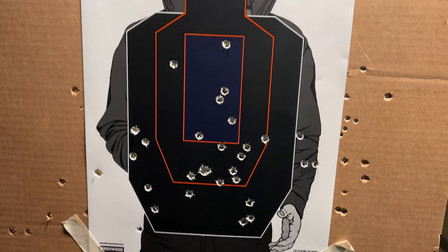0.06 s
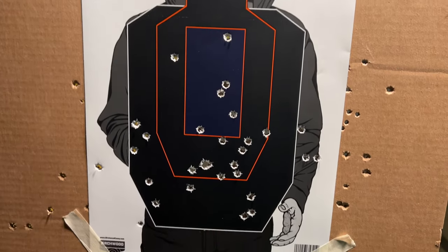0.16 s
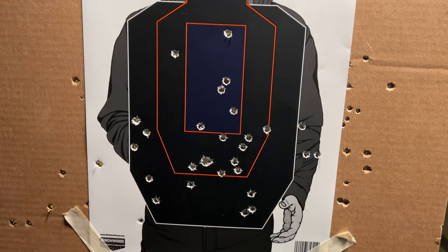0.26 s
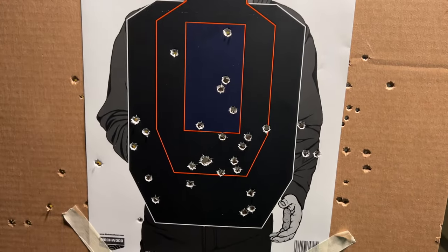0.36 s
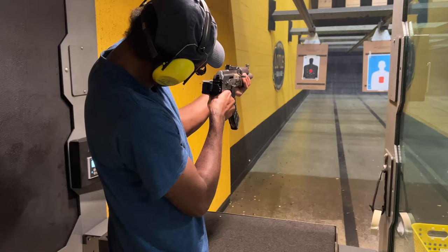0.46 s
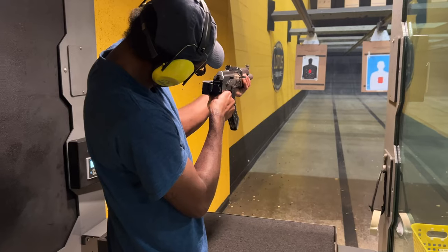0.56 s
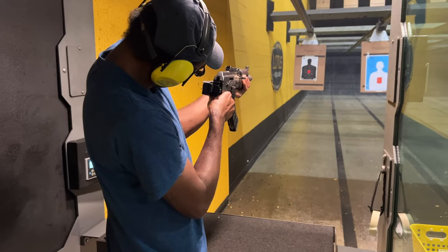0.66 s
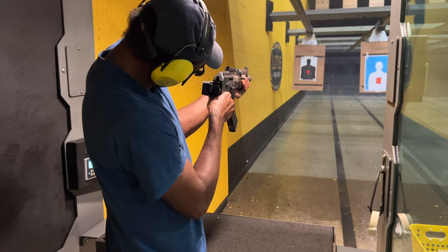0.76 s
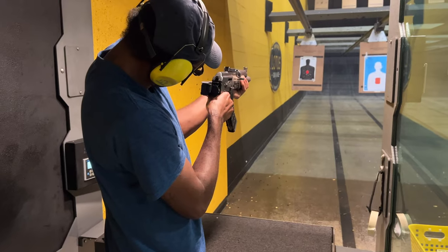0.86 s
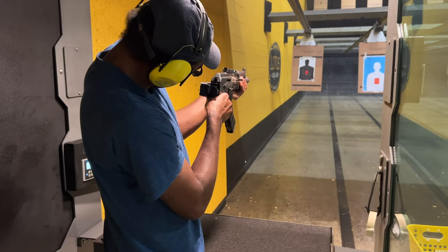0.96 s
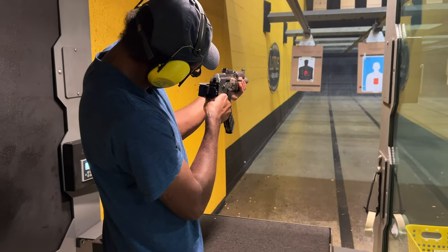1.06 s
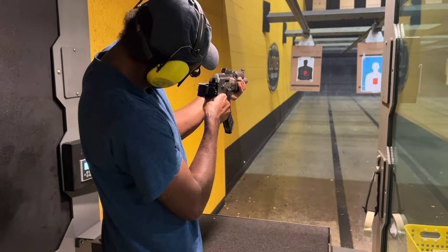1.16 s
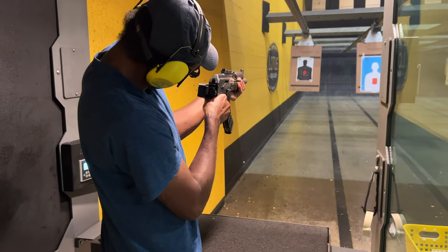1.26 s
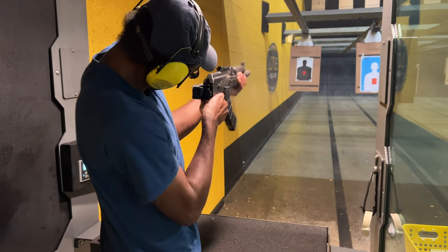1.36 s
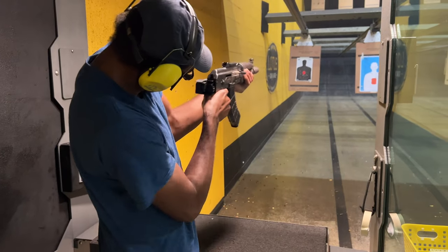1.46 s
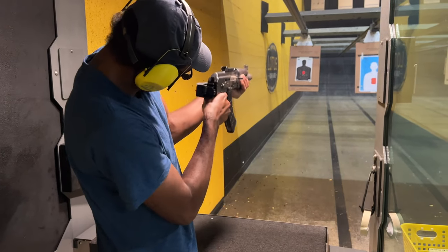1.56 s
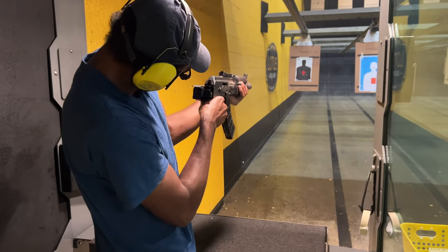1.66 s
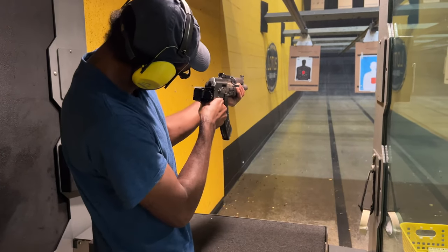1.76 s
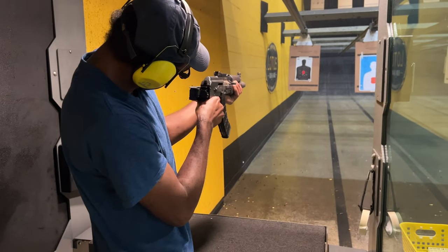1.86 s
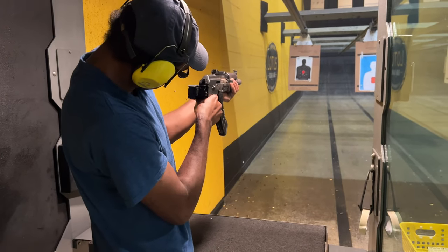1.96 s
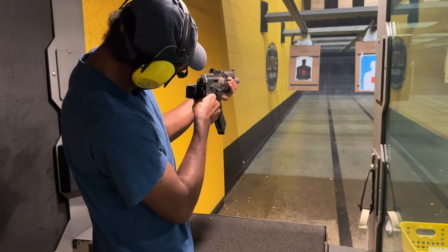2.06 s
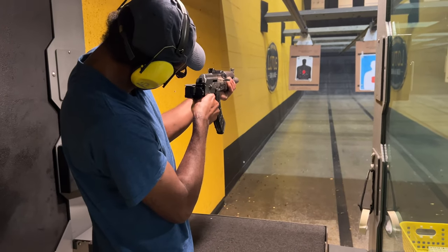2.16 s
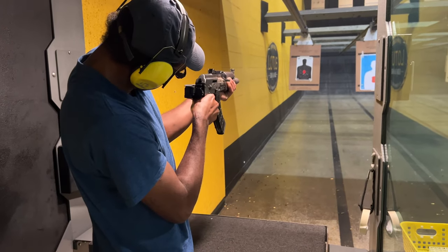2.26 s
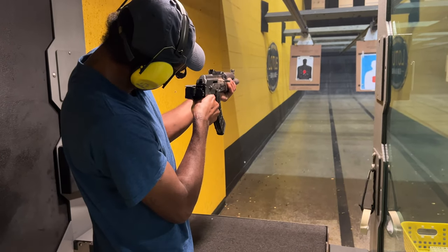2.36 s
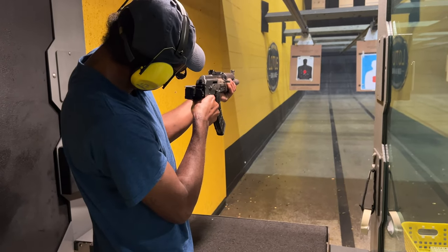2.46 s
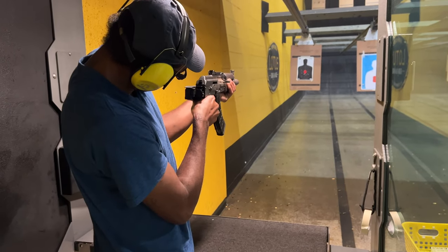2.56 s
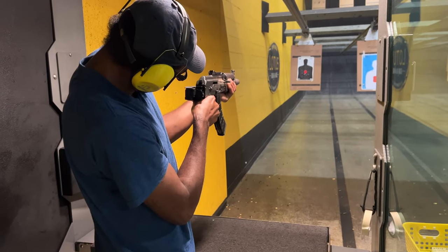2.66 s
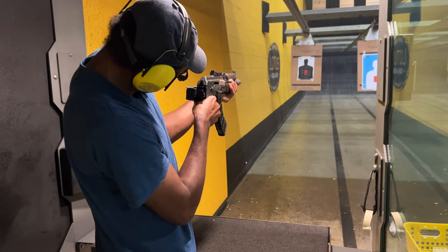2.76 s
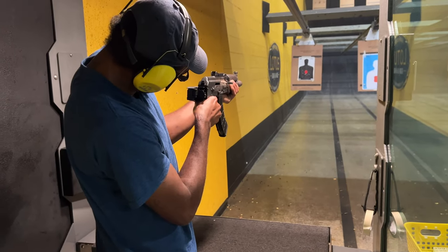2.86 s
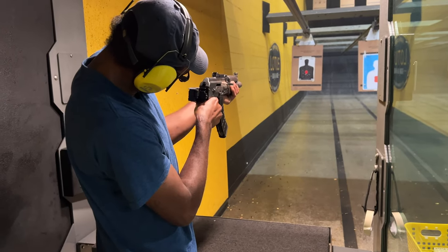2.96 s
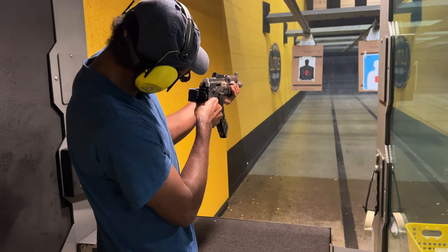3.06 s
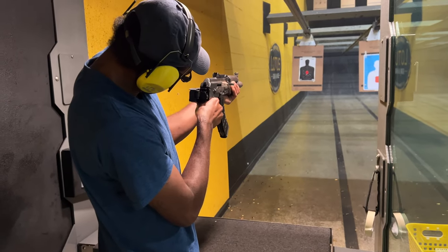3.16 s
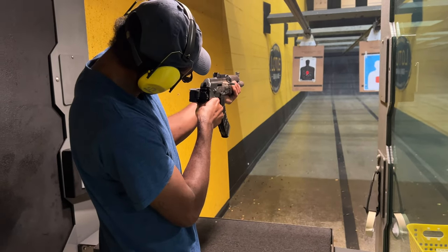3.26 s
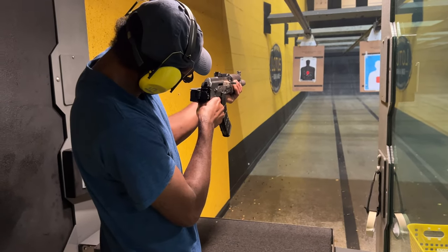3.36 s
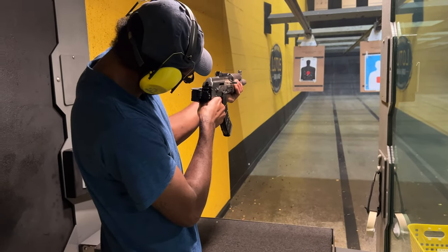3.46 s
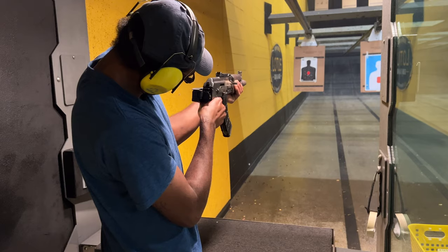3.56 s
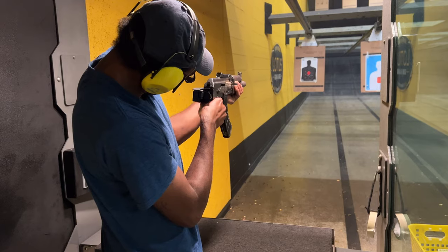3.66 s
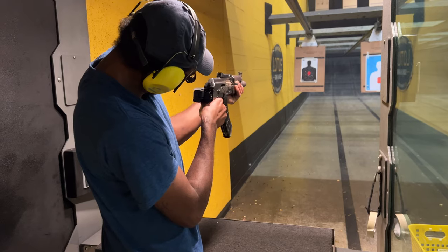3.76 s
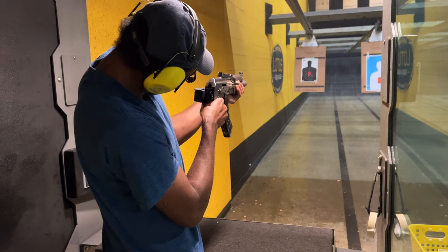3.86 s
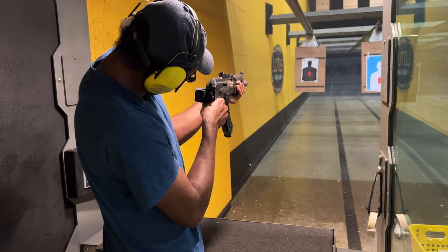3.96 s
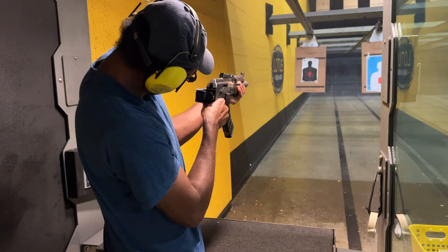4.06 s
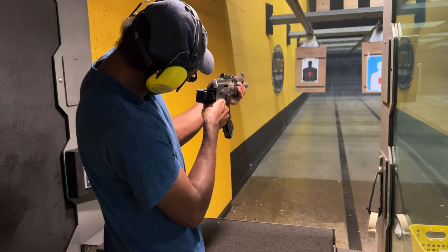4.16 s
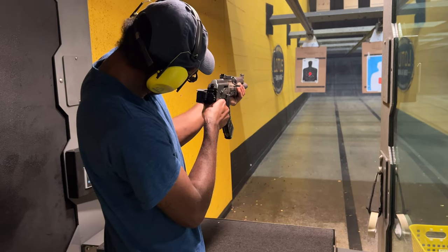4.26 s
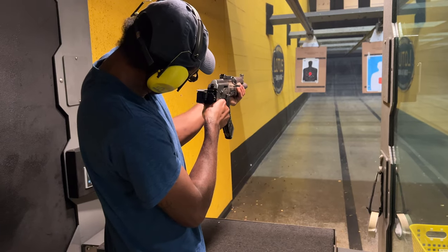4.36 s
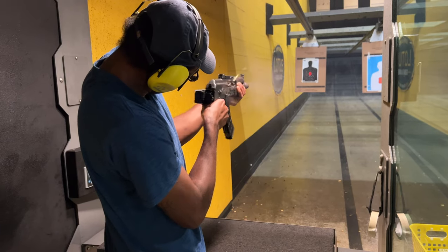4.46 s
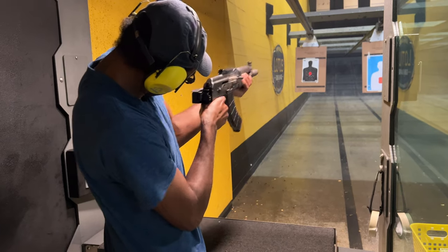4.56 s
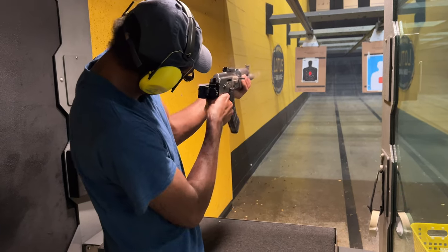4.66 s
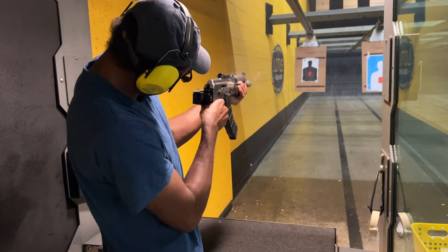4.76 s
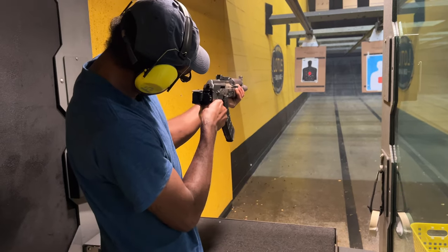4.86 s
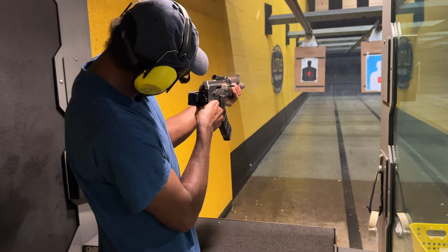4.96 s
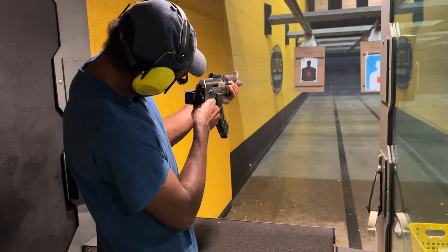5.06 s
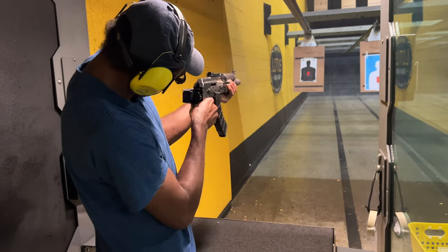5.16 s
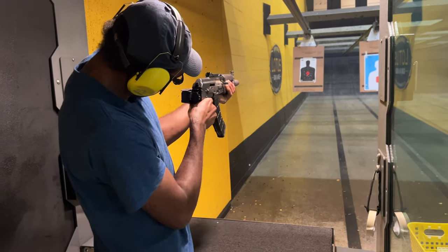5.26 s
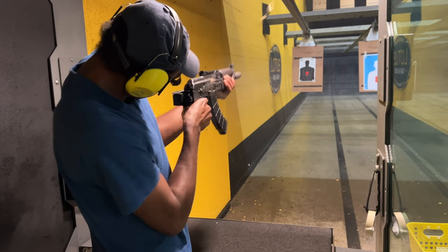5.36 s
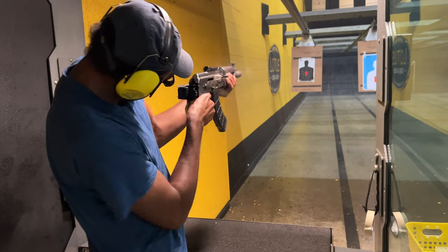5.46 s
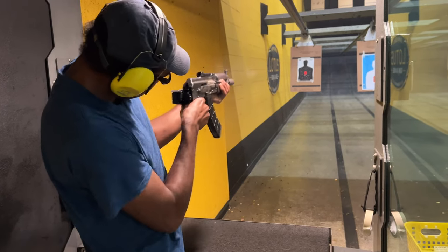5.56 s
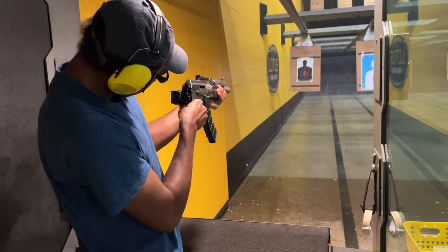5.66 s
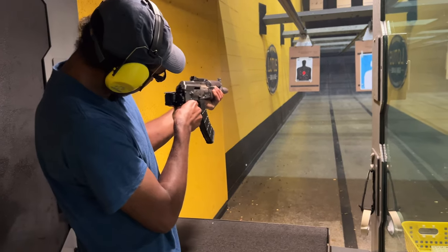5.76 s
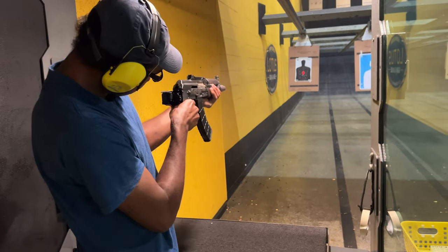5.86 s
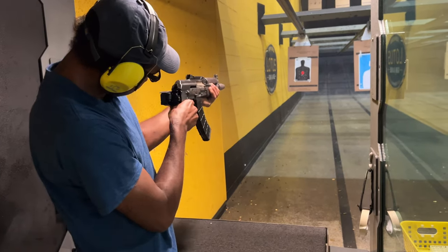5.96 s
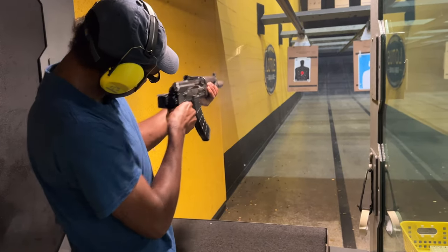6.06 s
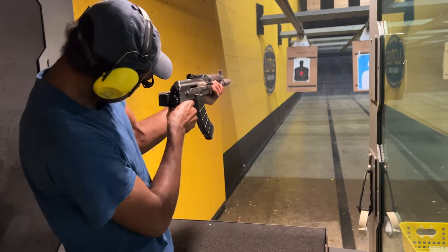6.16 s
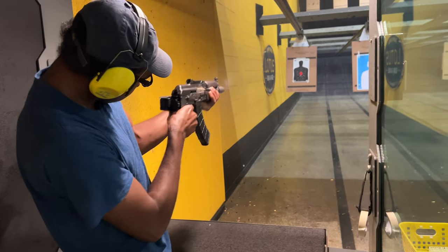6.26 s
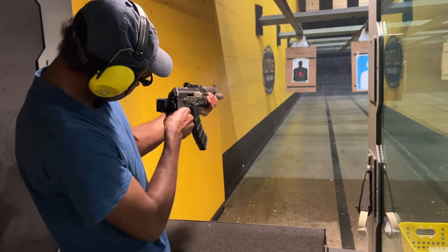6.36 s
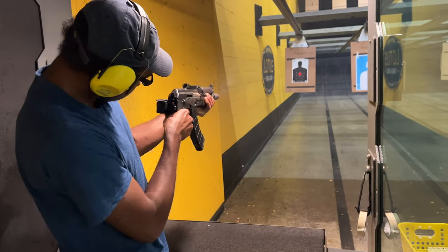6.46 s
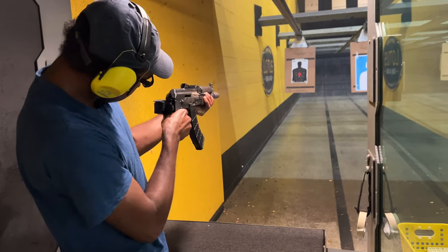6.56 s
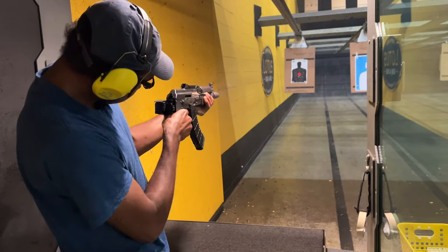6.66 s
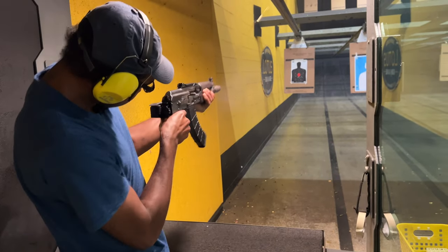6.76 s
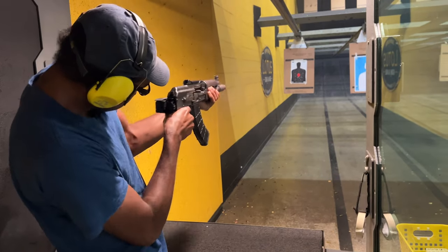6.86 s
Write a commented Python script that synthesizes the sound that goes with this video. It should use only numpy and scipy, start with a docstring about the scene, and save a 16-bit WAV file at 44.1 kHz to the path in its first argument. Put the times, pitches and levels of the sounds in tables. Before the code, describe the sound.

Ventilation hums in an indoor shooting range, then five loud gunshots crack and boom, each rolling away in a long concrete echo.

```python
"""Five pistol shots in a concrete indoor range, heard from just behind the shooter's booth.
Each is bands of two-channel noise under decay envelopes: booth blast, wave fronts, late return of the hall.
Filtered noise with wavering tones is the ventilation, loud at the target, then quieter in the booth.
A decaying sine with rustling noise settles the gun; a short dull noise burst comes just before each shot.
Spent cases tinkle on the floor as decaying modes of brass."""
import sys
import numpy as np
from scipy import signal
from scipy.fft import rfft, irfft, next_fast_len
from scipy.io import wavfile
from scipy.ndimage import uniform_filter1d

SR = 44100
rng = np.random.default_rng(int(sys.argv[2]) if len(sys.argv) > 2 else 0)


def store_wav(level_fs):
    """Save 16-bit WAV to argv[1]."""
    pcm = np.round(np.clip(np.atleast_2d(level_fs), -1, 1) * 32767)
    wavfile.write(sys.argv[1], SR, pcm.T.astype(np.int16))


N = 305400
TIME = np.arange(N) / SR


def undb(db):
    """Level to amplitude: 20 dB is a factor of ten."""
    return 10 ** (np.asarray(db) / 20)


def at(table, hz):
    """Logarithmic frequency scale: values are interpolated linearly over log f."""
    f, value = np.transpose(table)
    return np.interp(np.log(np.maximum(hz, 1)), np.log(f), value)


def fade(t, rise, t60):
    """Build-up and exponential decay: energy saturates from t = 0 and falls by 60 dB in t60."""
    t = np.maximum(t, 0)
    build_up = 1 - np.exp(-t / rise)
    return build_up * np.exp(-np.log(1000) * t / t60)


def walk(rate):
    """Random modulation: Gaussian values, rate per second, joined by lines; spread near 1."""
    knots = rng.standard_normal(4096)
    return np.interp(TIME * rate, np.arange(len(knots)), knots)


def add(out, s, x):
    """Superposition: x is summed into out from time s on."""
    i = int(s * SR)
    out[:, i:i + x.shape[1]] += x[:, :N - i]


# Likeness of the left and right channels: (f/Hz, correlation)
CHANNEL_LIKENESS = [(50, .68), (130, .68), (280, .82), (500, .55), (1000, .16), (3000, .08), (7000, .14),
                    (9500, .85), (15000, .85)]
TREBLE_LAG_S = .000246


def two_channel_noise(size, lag_from_hz=7000):
    """Correlation: mid and side share power; in the top treble both sides are alike, left slightly late."""
    f = np.fft.rfftfreq(size, 1 / SR)
    correlation = np.clip(at(CHANNEL_LIKENESS, f), 0, 1)
    mid, side = rfft(rng.standard_normal((2, size)))
    mid = mid * np.sqrt((1 + correlation) / 2)
    side = side * np.sqrt((1 - correlation) / 2)
    lag = np.exp(-2j * np.pi * f * TREBLE_LAG_S * (f > lag_from_hz))
    return np.array([(mid + side) * lag, mid - side])


def noise(colour):
    """Spectral shaping: two-channel noise takes the colour (f/Hz, level/dB) and is scaled to rms 1."""
    size = next_fast_len(N, True)
    gain = undb(at(colour, np.fft.rfftfreq(size, 1 / SR)))
    x = irfft(two_channel_noise(size) * gain, size)[:, :N]
    return x / x.std()


def fans(colour, db, tones):
    """Turbulence and tonal radiation: rushing air, plus fan and duct tones wavering in level and phase."""
    out = noise(colour) * undb(db + 0.66 * walk(4.8))
    for hz, tone_db, width in tones:
        phase = 2 * np.pi * hz * TIME
        # independent quadrature parts spread the line over a narrow band
        tone = walk(width) * np.sin(phase) + walk(width) * np.cos(phase)
        out = out + undb(tone_db) * tone
    return out


# Spectrum of the air at the target: (f/Hz, relative level/dB)
TARGET_AIR = [(15, -40), (25, -19), (65, 0.5), (113, -16), (155, -6), (208, -13.5), (278, -6), (403, -20.5),
              (511, 1), (599, -19), (684, -11), (966, -19), (1560, -19), (3500, -37), (14000, -64)]
# Fan and duct tones at the target: (f/Hz, level/dB, waver rate/Hz)
TARGET_TONES = [(75.2, -60, 7), (150, -57.5, 7), (176, -62, 11.6), (276, -64, 5), (525, -59.5, 4.5),
                (673, -68, 15)]
# Spectrum of the air in the booth: (f/Hz, relative level/dB)
BOOTH_AIR = [(25, -13.5), (50, 1), (105, -12), (160, -6), (231, -4.5), (315, -14), (400, -12), (600, -15),
             (900, -17), (1600, -19), (2300, -27.5), (5600, -41.5), (10000, -49), (15000, -48.5)]
# Fan and duct tones in the booth, before the level course: (f/Hz, level/dB, waver rate/Hz)
BOOTH_TONES = [(65, -76, 18), (188, -77, 13), (493, -78, 14), (510, -75, 65), (670, -82, 35),
               (820, -82, 40), (1020, -86, 40), (1540, -81.5, 200)]
# Level course of the booth ventilation: (t/s, level change/dB)
BOOTH_AIR_COURSE = [(.5, 5.5), (.7, 2), (1.2, 5), (3.4, 0), (4.4, -1)]
# air levels in dB; the booth's is before its level course
TARGET_AIR_DB, BOOTH_AIR_DB = -50.4, -64.2
MOVE_S = .5


def ventilation(fade_s=0.036):
    """Stationary flow noise: the target's loud air fades out, then the booth's quieter air fades in."""
    target = fans(TARGET_AIR, TARGET_AIR_DB, TARGET_TONES)
    booth = fans(BOOTH_AIR, BOOTH_AIR_DB, BOOTH_TONES)
    target = target * np.clip((MOVE_S - TIME) / fade_s, 0, 1)
    booth = booth * np.clip((TIME - MOVE_S) / fade_s, 0, 1)
    return target + booth * undb(np.interp(TIME, *np.transpose(BOOTH_AIR_COURSE)))


# Case landings: (t/s, low ring level/dB, middle ring level/dB, high ring level/dB)
BOUNCES = [(2.34, -88, -102, -80), (2.776, -80, -110, -86), (2.935, -79, -110, -86), (2.955, -88, -91, -61),
           (3.167, -90, -110, -90), (3.409, -96, -83, -85), (6.66, -84, -92, -77)]
# Modes of a brass case: (f/Hz, t60/s, ring: 0 low, 1 middle, 2 high)
CASE_MODES = [(8700, .4, 0), (8810, 0.43, 0), (11080, .5, 1), (14810, .3, 2), (15070, .3, 2),
              (15410, .3, 2)]


def cases(flutter=0.53, tick_gain=0.1256):
    """Modal excitation by impact: each landing ticks and rings the brass modes in its own mix."""
    out, t = np.zeros((2, N)), TIME[:SR // 2]
    tick = noise([(2000, -30), (6000, 0), (15000, 0)])[:, :len(t)] * fade(t, .001, .15)
    for s, *ring_db in BOUNCES:
        # the tick follows the loudest ring
        add(out, s, undb(max(ring_db)) * tick_gain * tick)
        for hz, t60, ring in CASE_MODES:
            phase = 2 * np.pi * (hz * t + rng.random((2, 1)))
            tumble = 1 + flutter * walk(70)[:len(t)]
            envelope = undb(ring_db[ring]) * tumble * fade(t, .001, t60)
            add(out, s, envelope * np.sin(phase))
    return out


# Movements of the gun: (t/s, thud level/dB, thud f/Hz, rustle level/dB, thud t60/s)
HANDLING = [(1.026, -39, 135, -52, .17), (1.082, -45, 127.9, -70, .3), (1.16, -58, 160, -72, .7)]


def handling():
    """Damped resonance and friction: thuds and brief rustles as the gun is settled for aiming."""
    rustle_colour = [(200, -6), (450, 2), (900, -8), (2000, -7), (6000, -10), (9000, -18.5), (15000, -34.5)]
    out = 0
    for s, thud_db, hz, rustle_db, t60 in HANDLING:
        since = TIME - s
        thud = np.sin(2 * np.pi * hz * since) * fade(since, 0.011, t60)
        # the rustle outlasts the thud
        rustle = noise(rustle_colour) * fade(since, 0.0098, 1.6 * t60)
        out = out + undb(thud_db) * thud + undb(rustle_db) * rustle
    return out


# Shots, played by lead_burst() and shots():
# (t/s, relative level/dB, extra bass level/dB, far return relative level/dB)
SHOTS = [(1.3193, 1.6, 1.5, 1.2), (4.4675, 1.3, 0, 1.7), (5.3153, -0.5, 1.4, .5), (6.0422, -.7, 0, 1.4),
         (6.725, -1.7, 0.2, 2.5)]
LEAD_BURST_S = .011


def lead_burst(db=-39):
    """Exponentially damped noise: a short dull burst starts just before each shot."""
    burst = noise([(200, -20), (850, -1.5), (1500, -6), (3500, -5), (5500, -8), (7200, -8),
                   (9000, -28), (15000, -45.5)])
    envelope = sum(fade(TIME - s + LEAD_BURST_S, 0.0024, .08) for s, *_ in SHOTS)
    return undb(db) * burst * envelope


def even(x, size):
    """Envelope normalisation: slow swells in mid and side are levelled, the fine grain stays."""
    pair = np.array([x[0] + x[1], x[0] - x[1]]) / 2
    power = pair ** 2 / np.mean(pair ** 2, axis=1, keepdims=True)
    # the small constant limits the lift of quiet stretches
    mid, side = pair / np.sqrt(uniform_filter1d(power, size) + 1 / 20)
    return np.array([mid + side, mid - side])


def repeats(front, first_s, step_s, step_db, count, keep=1):
    """Periodic reflection: equal delays, equal level steps, and a kept share of the bandwidth each time."""
    db, hz, octaves, rise, t60 = front
    return [(first_s + k * step_s, db + k * step_db, hz, octaves * keep ** k, rise, t60)
            for k in range(count)]


# Kinds of wave front, each one row: (level/dB per Hz, centre f/Hz, width/octaves, rise/s, t60/s)
MUZZLE_CRACK = (-41.5, 1400, 1.8, .0008, .011)
FLOOR_THUMP = (-35, 75, 1.2, .003, .08)
SIDE_SLAP = (-47.5, 1200, 1.2, .0015, .06)
FAR_SLAP = (-49.5, 1500, 1.6, .0015, .06)
BAFFLE_ECHO = (-43, 355, .8, .004, .17)
FAR_FLUTTER = (-44.5, 900, 1.55, .003, .1)
NEAR_BOOM = (-32, 95, 1.2, .005, .09)
FAR_BOOM = (-32, 155, 1.4, .004, .09)
# first arrivals after the shot
MUZZLE_S, FLOOR_S, BAFFLE_S, SIDE_S = .0012, .012, .0225, .034
FAR_SLAP_S, NEAR_BOOM_S, FAR_BOOM_S = .131, .048, .178
# evenly spaced ceiling baffles: the outward echo gains as the beam grazes them more flatly
BAFFLE_STEP_S, BAFFLE_STEP_DB = .0198, 1.3
# the far wall's echo returns under the same baffles: level step and share of bandwidth kept at each
FAR_FLUTTER_DB, FAR_FLUTTER_KEEP = -1.4, .93
# bass rolling along the lane: time, level step and share of bandwidth kept per round trip
ROUND_TRIP_S, ROUND_TRIP_DB, ROUND_TRIP_KEEP = .198, -8.5, .75


def wave_fronts():
    """Early reflections: crack, floor thump and wall slaps, baffle flutter out and back, rolling booms."""
    single = [(MUZZLE_S, *MUZZLE_CRACK), (FLOOR_S, *FLOOR_THUMP),
              (SIDE_S, *SIDE_SLAP), (FAR_SLAP_S, *FAR_SLAP)]
    outward = repeats(BAFFLE_ECHO, BAFFLE_S, BAFFLE_STEP_S, BAFFLE_STEP_DB, count=7)
    homeward = repeats(FAR_FLUTTER, FAR_SLAP_S + BAFFLE_STEP_S, BAFFLE_STEP_S, FAR_FLUTTER_DB,
                       count=6, keep=FAR_FLUTTER_KEEP)
    near = repeats(NEAR_BOOM, NEAR_BOOM_S, ROUND_TRIP_S, ROUND_TRIP_DB, count=4, keep=ROUND_TRIP_KEEP)
    far = repeats(FAR_BOOM, FAR_BOOM_S, ROUND_TRIP_S, ROUND_TRIP_DB, count=4, keep=ROUND_TRIP_KEEP)
    return single + outward + homeward + near + far


# Blast among the booth walls: (f/Hz, level/dB per Hz)
BOOTH = [(25, -73), (40, -57), (58, -45), (110, -47), (170, -45), (280, -45), (500, -48), (850, -47.5),
         (1500, -52.5), (3000, -53.5), (6000, -56.5), (8400, -61.5), (11000, -65.5), (16000, -66.5)]
# Decay of the booth: (f/Hz, t60/s)
BOOTH_DECAY = [(60, 1.2), (400, 1.4), (800, .9), (2000, .85), (6000, .75), (13000, .4)]
# Long echo of the whole range: (f/Hz, level/dB per Hz)
HALL = [(25, -75), (40, -62), (62, -46.5), (110, -55.5), (170, -52), (240, -40.5), (420, -47.5),
        (650, -49.5), (1100, -52), (3000, -56.5), (6000, -59), (8400, -67.5), (11500, -76.5), (16000, -83)]
# Decay of the whole range: (f/Hz, t60/s)
HALL_DECAY = [(50, 2.2), (120, 2.3), (300, 1.45), (1000, 1.412), (3000, 1.415), (6000, 1.054), (9000, 0.69),
              (12000, .6), (16000, .5)]
# Standing waves of the lane and booth: (f/Hz, width/Hz, lift/dB)
STANDING_WAVES = [(145, 14, 3), (172, 25, -4), (228, 30, 2.5), (398, 14, 3), (476, 24, 4), (820, 35, 3),
                  (930, 70, 2.5), (1450, 27, 3.5), (1635, 40, 4), (1970, 24, 4), (3007, 34, 3),
                  (4126, 50, 2), (6003, 65, 2), (6271, 50, 4)]
# Balance, left minus right: (f/Hz, level difference/dB)
BALANCE = [(60, 0), (130, 1.6), (300, .4), (1300, 0), (2700, -2.7), (5500, 2), (12000, -0.2)]
FAR_WALL_S = 0.12


def shots(size=110592, scramble_hz=1500, lowest_change=0.14, bass_hz=500, build_cycles=0.8,
          far_rise_s=0.016, near_rise_s=0.0022, clump_db=0.8, clump_rate=260, clump_hz=600):
    """Reverberation: blasts excite the same reflections; stirred air scrambles their treble each time."""
    t, f = np.arange(size) / SR, np.fft.rfftfreq(size, 1 / SR)
    standing_db = sum(db / (1 + (2 * (f - hz) / width) ** 2) for hz, width, db in STANDING_WAVES)
    # share of the power that is new with each shot
    change = np.clip(lowest_change + f ** 2 / (f ** 2 + scramble_hz ** 2), 0, 1)
    walls = two_channel_noise(size)
    fields = np.array([walls * np.sqrt(1 - change) + two_channel_noise(size) * np.sqrt(change)
                       for _ in SHOTS])
    fields = (fields * undb(standing_db)).astype(np.complex64)
    # reflections arrive in clumps, which makes the treble crackle
    clumps = clump_db * walk(clump_rate)[:size]
    fronts = wave_fronts()
    front_power = np.array([(undb(db) * fade(t - delay, rise, t60)) ** 2
                            for delay, db, _, _, rise, t60 in fronts])
    _, _, front_hz, front_width, _, _ = np.transpose(fronts)
    out = np.zeros((2, N))
    for hz in 25 * 2 ** (np.arange(20) / 2):
        # overlapping bands spaced by half an octave; long waves need longer to fill the booth
        band = np.maximum(1 - 2 * abs(np.log2((f + 1e-9) / hz)), 0).astype(np.float32)
        build = build_cycles / hz
        booth = undb(at(BOOTH, hz)) * fade(t, build + near_rise_s, at(BOOTH_DECAY, hz))
        front_share = np.exp(-(np.log2(hz / front_hz) / front_width) ** 2)
        near_power = booth ** 2 + front_share @ front_power
        hall = undb(at(HALL, hz)) * fade(t - FAR_WALL_S, far_rise_s + build / 2, at(HALL_DECAY, hz))
        far_power = hall ** 2
        # the root turns level per Hz into level over the full bandwidth
        grain = undb(clumps * hz / (hz + clump_hz)) * np.sqrt(SR / 2)
        balance = undb(at(BALANCE, hz) * np.array([[1], [-1]]) / 2)
        for (s, db, bass_db, far_db), field in zip(SHOTS, fields):
            gain = undb(db + bass_db / (1 + (hz / bass_hz) ** 2))
            decay = np.sqrt(near_power + far_power * undb(far_db) ** 2)
            envelope = gain * grain * balance * decay
            add(out, s, even(irfft(field * band, size), size=2400) * envelope)
    return out


def scene():
    """Linear superposition: the shots over the small sounds of the range."""
    return ventilation() + cases() + handling() + lead_burst() + shots()


LOW_CUT_HZ, TOP_HZ = 40, 15800


def record(dry, ceiling=1.25):
    """Band limiting and saturation: deepest bass drops, loudest peaks are rounded, the top is cut."""
    thin = signal.sosfilt(signal.butter(4, LOW_CUT_HZ, "high", fs=SR, output="sos"), dry)
    rounded = ceiling * np.tanh(thin / ceiling)
    return signal.sosfilt(signal.ellip(10, .2, 80, TOP_HZ, fs=SR, output="sos"), rounded)


dry = scene()
out = record(dry)
store_wav(out)
```